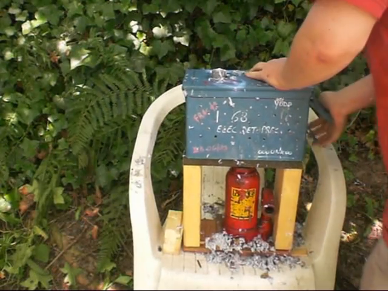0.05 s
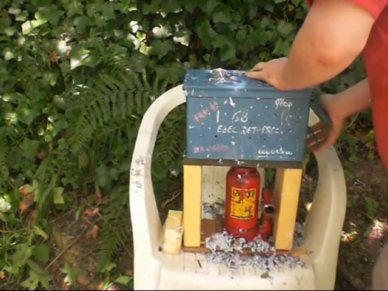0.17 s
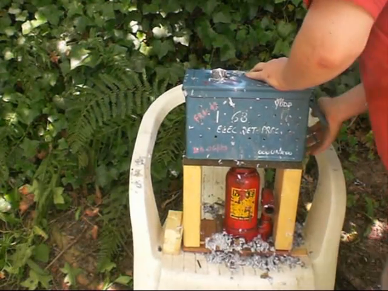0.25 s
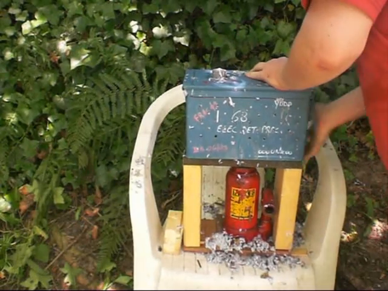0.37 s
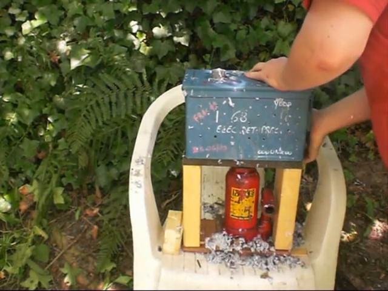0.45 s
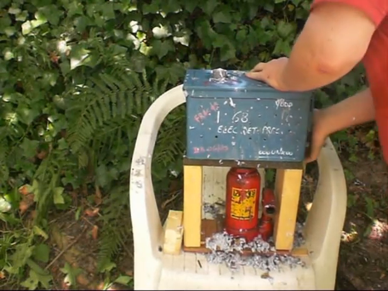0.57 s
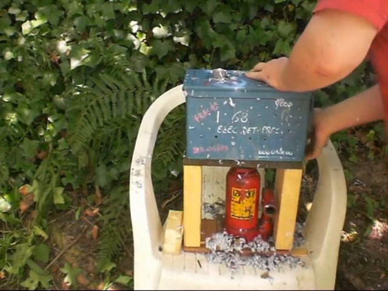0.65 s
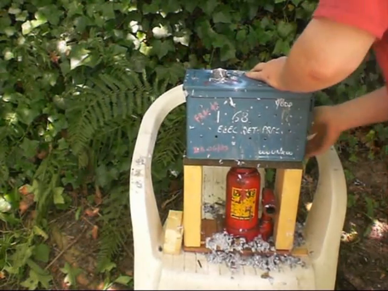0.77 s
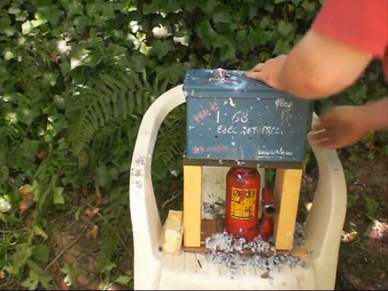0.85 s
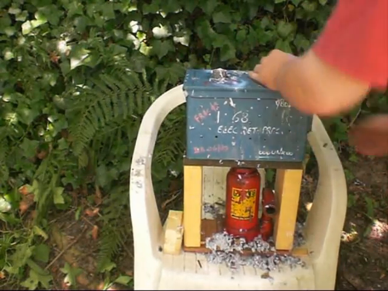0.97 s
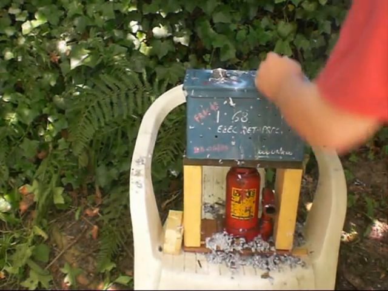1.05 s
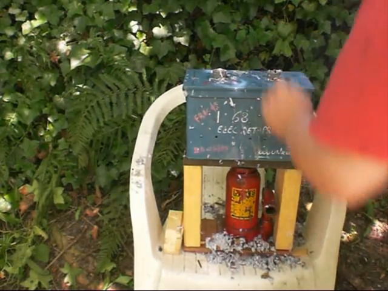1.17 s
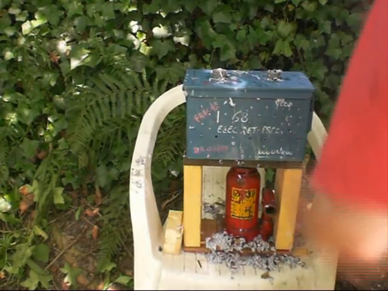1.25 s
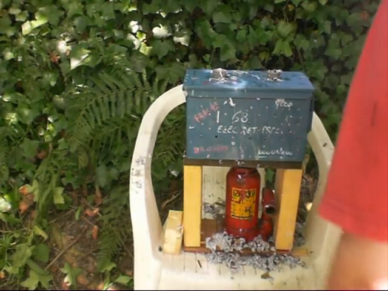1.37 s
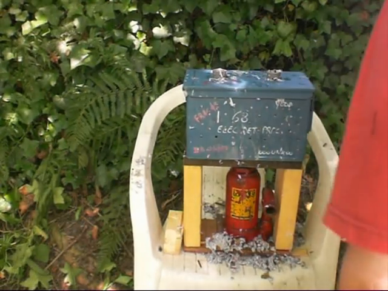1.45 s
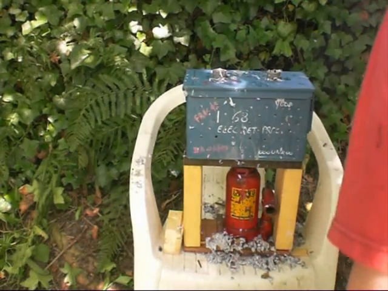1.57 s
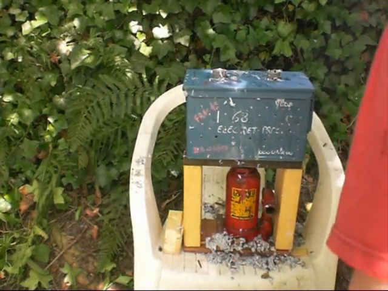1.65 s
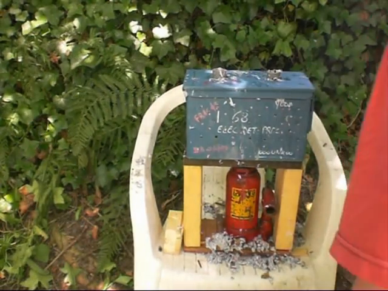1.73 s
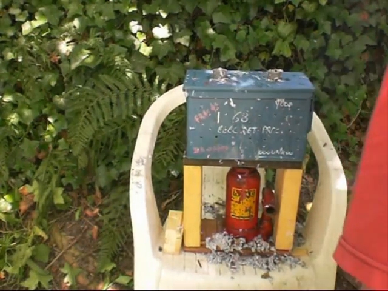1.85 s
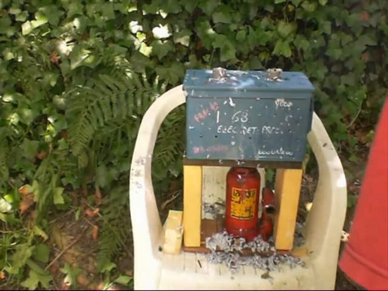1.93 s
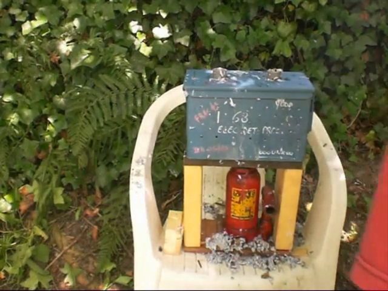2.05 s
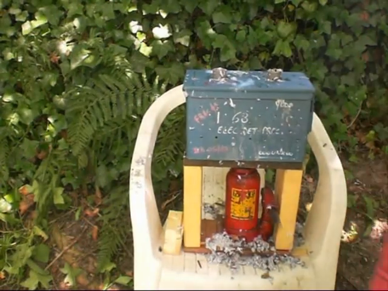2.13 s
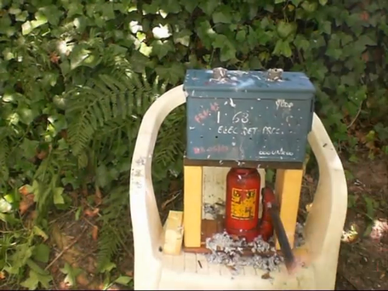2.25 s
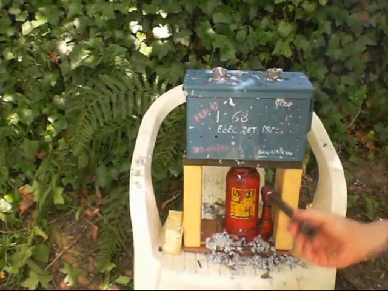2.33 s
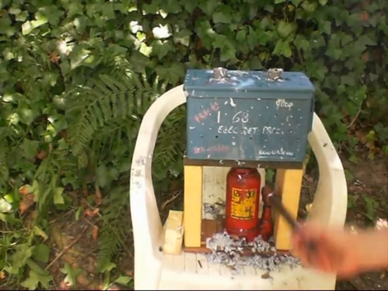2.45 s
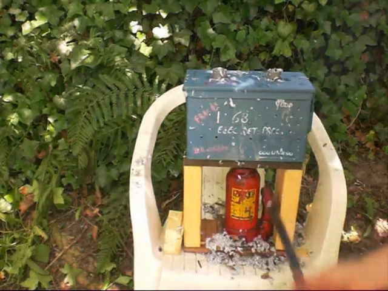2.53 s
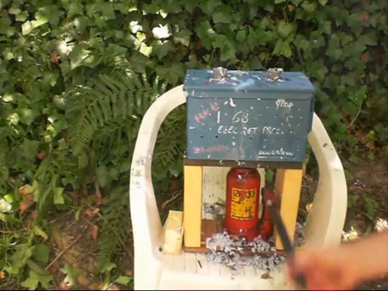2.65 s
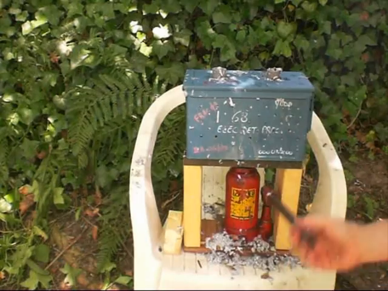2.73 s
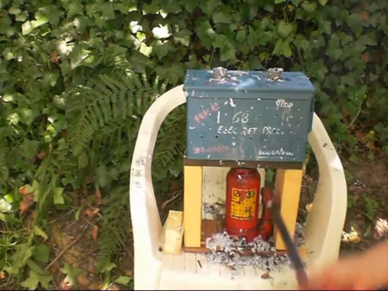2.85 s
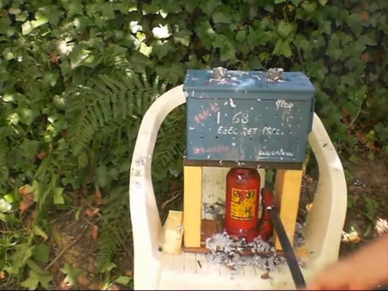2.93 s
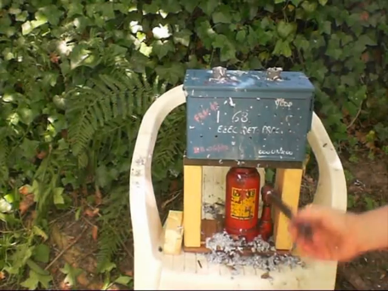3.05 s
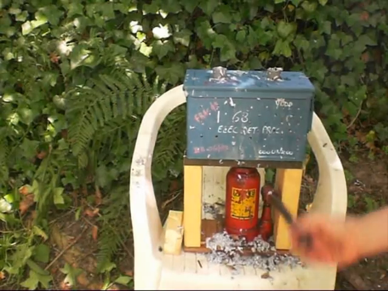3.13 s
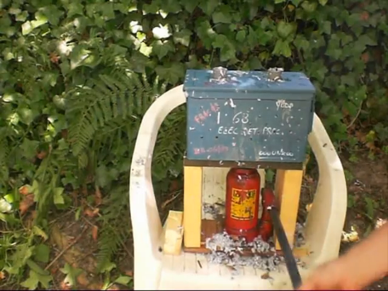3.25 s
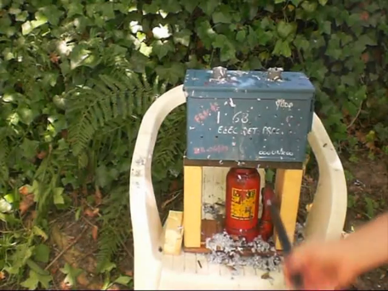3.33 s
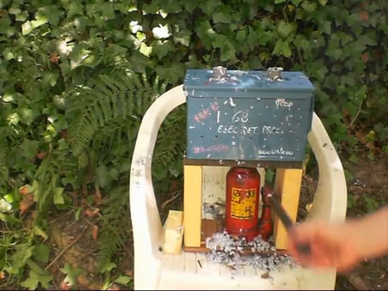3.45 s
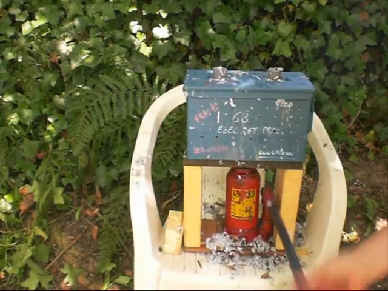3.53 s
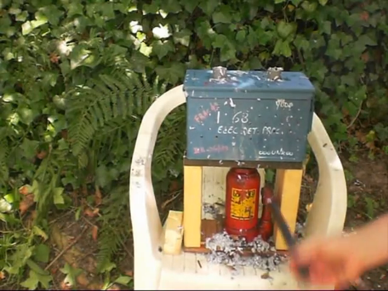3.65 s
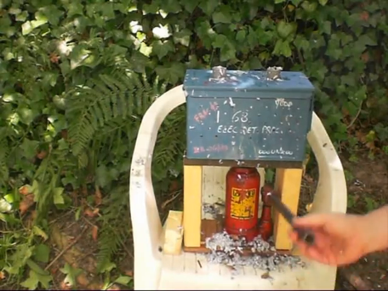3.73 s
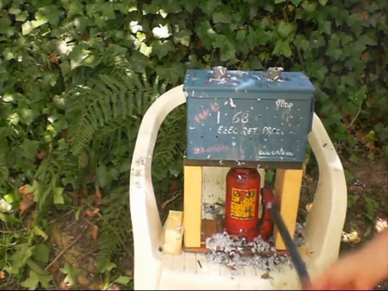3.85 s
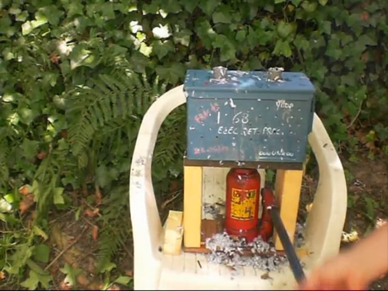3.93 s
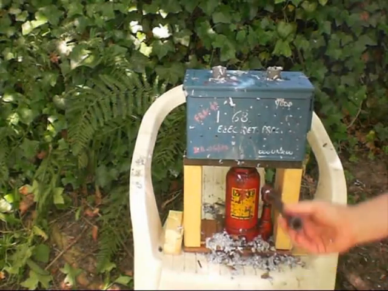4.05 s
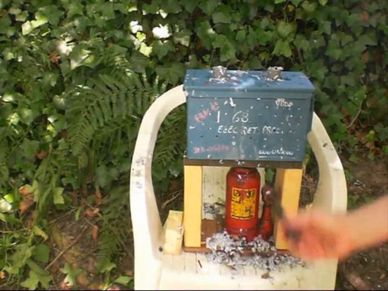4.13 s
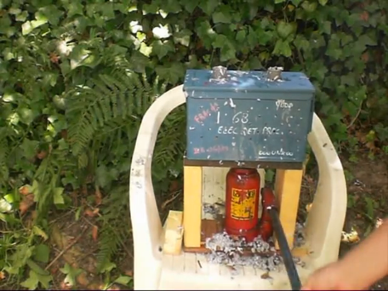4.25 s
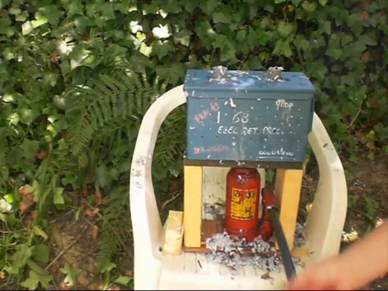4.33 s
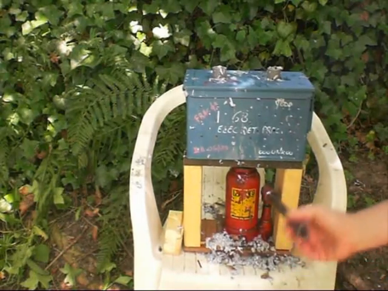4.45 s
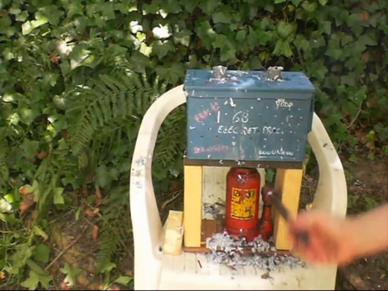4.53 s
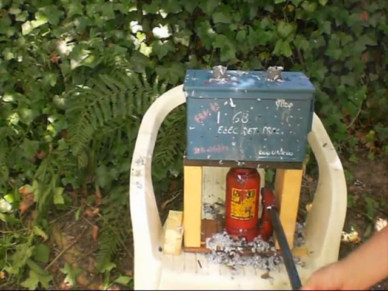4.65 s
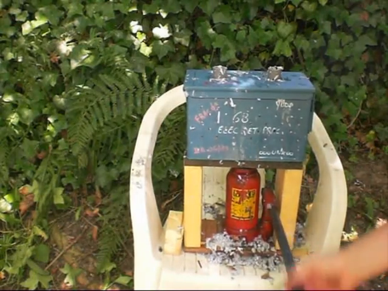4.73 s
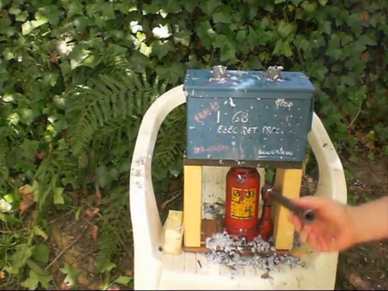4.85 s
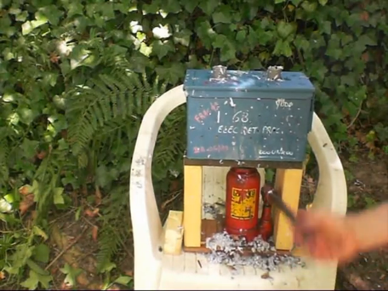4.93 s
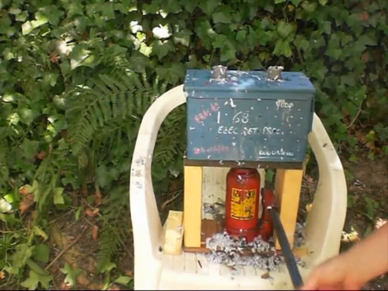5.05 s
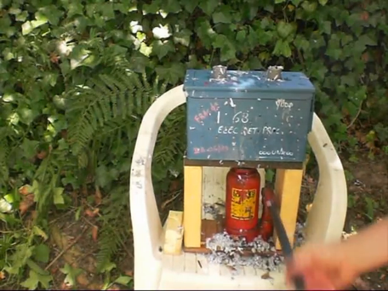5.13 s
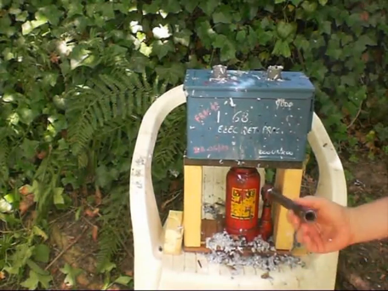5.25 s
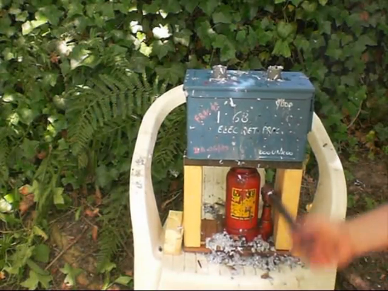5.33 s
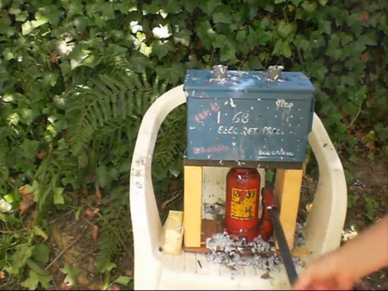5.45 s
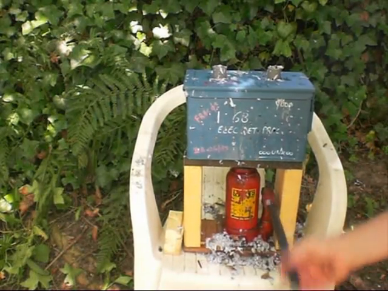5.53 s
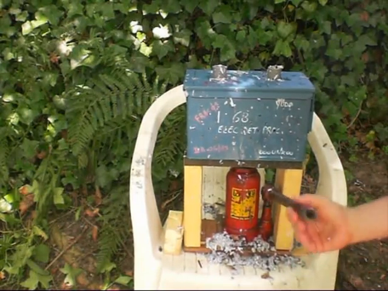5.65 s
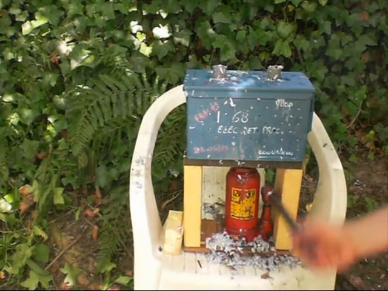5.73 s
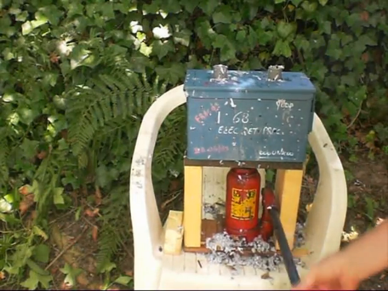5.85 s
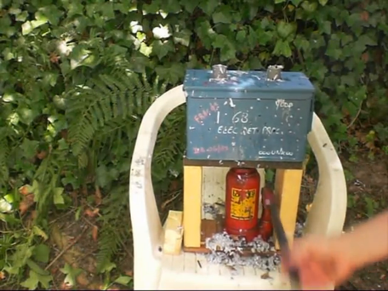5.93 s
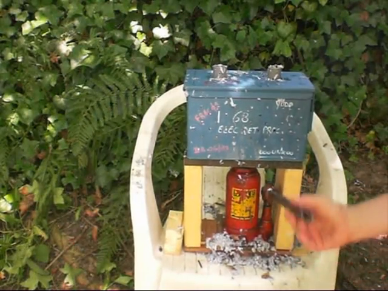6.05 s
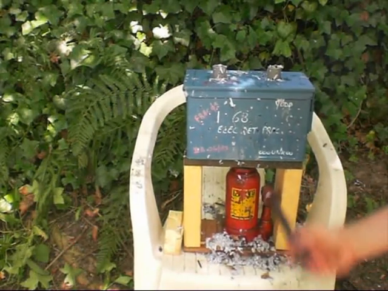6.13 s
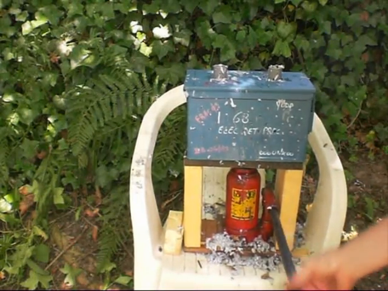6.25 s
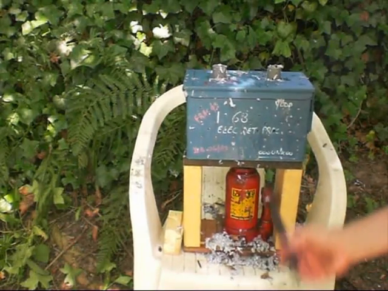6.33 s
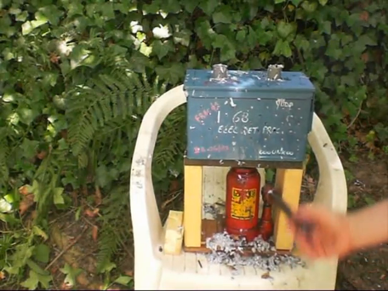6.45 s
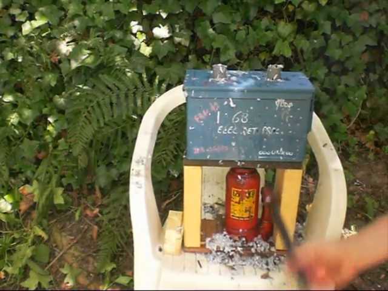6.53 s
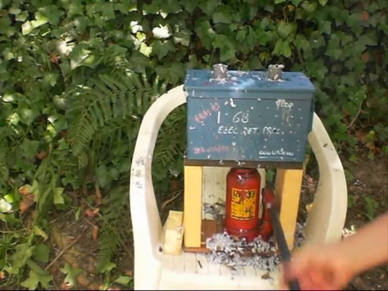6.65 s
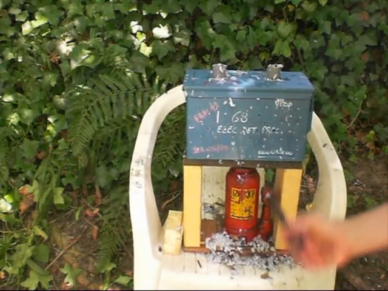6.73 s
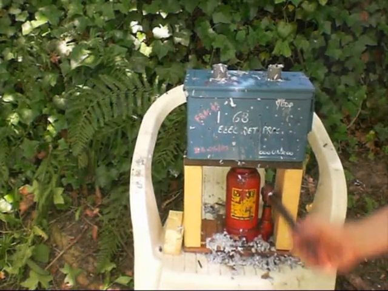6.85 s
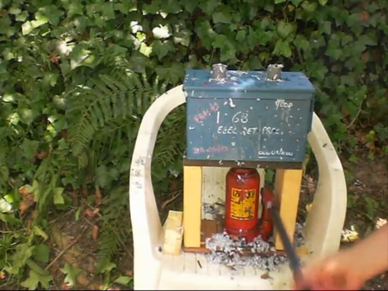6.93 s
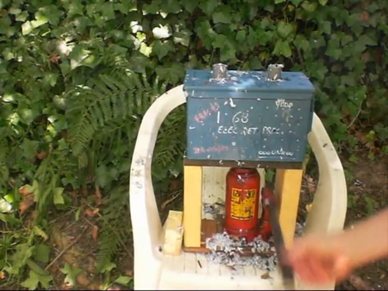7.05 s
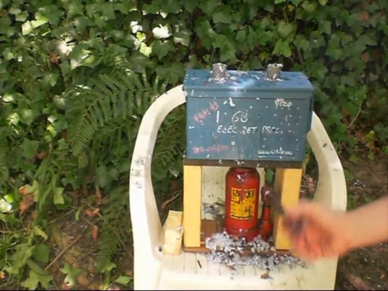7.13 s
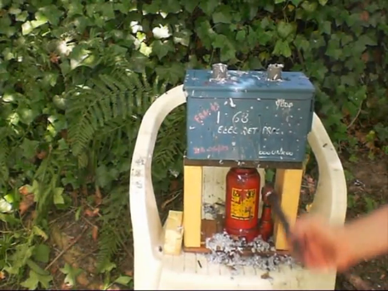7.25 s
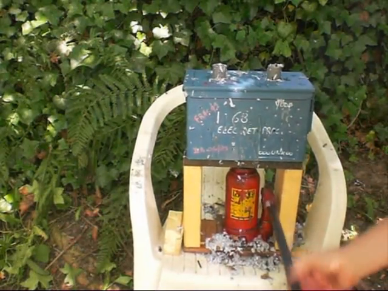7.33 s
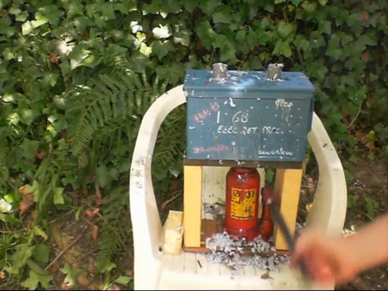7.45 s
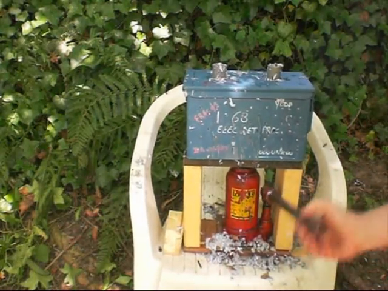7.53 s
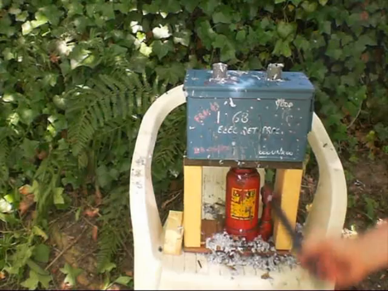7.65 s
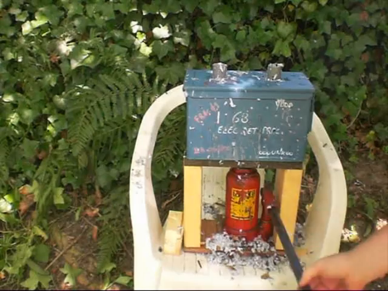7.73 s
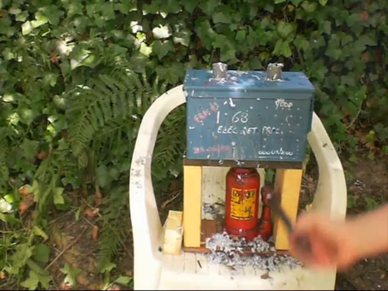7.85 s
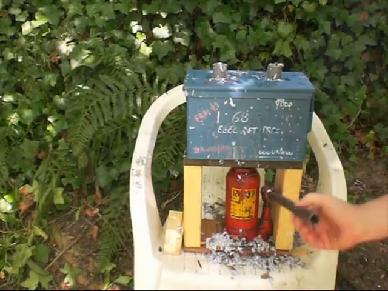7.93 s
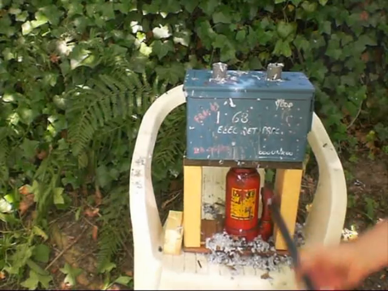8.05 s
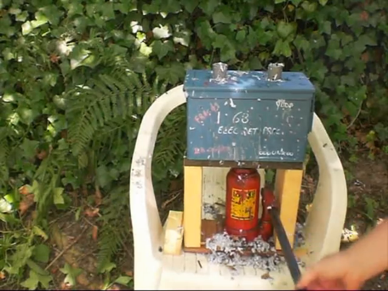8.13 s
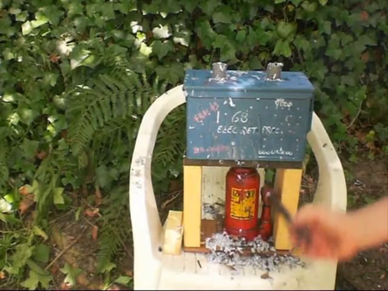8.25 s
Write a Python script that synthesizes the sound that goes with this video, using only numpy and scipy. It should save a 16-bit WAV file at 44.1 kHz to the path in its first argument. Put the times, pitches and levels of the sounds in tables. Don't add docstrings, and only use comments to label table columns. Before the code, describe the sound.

Close outdoors in a garden, a steel box lid gives a faint low groan and its sprung catch snaps shut. Clothes brush softly while small birds chatter far off. After a second and a half the jack handle is fitted and pumped quickly: bright ringing rattles, hard link-plate clacks and dull wooden knocks at both ends of every stroke, with short echoes from hedge and walls.

```python
import sys
import numpy as np
from scipy import signal
from scipy.fft import rfft, irfft, next_fast_len
from scipy.io import wavfile
from scipy.ndimage import uniform_filter1d

SR = 44100
rng = np.random.default_rng(int(sys.argv[2]) if len(sys.argv) > 2 else 0)


def magnitude_from_level(level_db):
    exponent = np.asarray(level_db, float) / 20
    return 10 ** exponent


def put_to_file(sound):
    columns = np.atleast_2d(sound).T
    safe = np.clip(columns, -1, 1)
    whole_steps = np.round(safe * 32767)
    wavfile.write(sys.argv[1], SR, whole_steps.astype(np.int16))


N = 365148

# pitch_hz, t60_s
HANDLE_MODES = [(1911, .09), (3622, .12), (5760, .17), (8192, .22)]
# start_s, body_db, links_db, handle_db, brightness_db (per mode)
LIFTS = [(1.663, -24.5, -14.5, -43, -1), (2.0738, -18.5, -20, -37, 3.5), (2.503, -11, -38, -30.5, 2.5),
         (2.826, -10.5, -37, -35, 3.5), (3.1378, -13, -10, -35.5, 1.5), (3.4866, -15.5, -19, -34.5, 7),
         (3.8054, -15, -23, -28.5, 1.5), (4.1457, -12, -6, -34.5, 1), (4.5431, -18.5, -8.5, -32.5, 1.5),
         (4.9086, -22.5, -10.5, -39, 1.5), (5.314, -17, -17, -43.5, 2), (5.7065, -17.5, -27, -46.5, 1),
         (6.0934, -14, -31, -35.5, 4), (6.4783, -17.5, -15, -42, 3), (6.8451, -16, -13, -38.5, 1),
         (7.2269, -16, -6.5, -39.5, 0.5), (7.5946, -23.5, -40, -64, -6), (7.991, -15, -10.5, -37.5, 2)]
# start_s, body_db, links_db, handle_db, brightness_db (per mode)
STOPS = [(1.907, -39, -9.5, -32.5, 0), (2.2782, -31, -7.5, -33, 2), (2.678, -17, -6.5, -34, -2.5),
         (2.996, -22, -20, -32.5, -3), (3.3311, -16.5, -17, -26, -1.5), (3.661, -22, -14.5, -46, -2.5),
         (3.981, -16, -1.5, -35, 6), (4.376, -25, -3, -31, 0), (4.7622, -26, -10, -24.5, 2),
         (5.1422, -30, -0.5, -26.5, 1.5), (5.5354, -17.5, 2, -30.5, 1), (5.938, -17, -1, -26.5, 1),
         (6.3154, -20, -5.5, -27, 2), (6.6869, -27, -5.5, -31.5, 0.5), (7.0802, -16.5, -9, -53, 6),
         (7.4643, -17, -6, -25.5, -1), (7.8283, -16, -4.5, -31, -3), (8.2167, -21.5, -7.5, -33.5, -2)]
# start_s, body_db, links_db, handle_db, brightness_db (per mode)
SKIPS = [(2.486, -55, -43, -64.5, 0), (2.516, -31, -37, -30, 6), (2.668, -42, -7, -37.5, 3.5),
         (2.853, -22, -34, -33.5, 9), (3.848, -25, -21, -37, 7), (4.7435, -41, -10, -53, -5.5),
         (5.7741, -20, -3, -35.5, 5.5), (6.264, -47, -45, -44, 4.5), (6.295, -28, -27, -38, 7),
         (6.641, -39, -45, -43, 3), (6.67, -25, -27, -40, 4), (6.8999, -24, -26, -36.5, 5.5),
         (6.914, -25.5, 2, -39.5, 6), (7.0686, -29, -10, -35, 3), (7.446, -23, -16, -36, 4.5),
         (7.6735, -19, -29, -32.5, 7), (7.683, -12.5, -4, -40.5, 3), (8.0511, -28, -27, -32.5, 6.5),
         (8.209, -27, -13, -41.5, -2)]
# start_s, body_db, links_db
CLACKS = [(1.496, -50, -15.5), (1.543, -21.5, -8), (1.7084, -32, -16), (1.725, -43, -9), (2.528, -33, 2.5),
          (2.5396, -30, -11), (2.577, -60, -34), (2.866, -19.5, 2), (3.5332, -20, -3), (3.8595, -16, 0.5),
          (3.898, -42, -36), (4.2042, -24.5, 0.5), (4.607, -21, -3), (4.77, -46, -4), (4.988, -21, -0.5),
          (5.382, -21, -3), (5.7904, -16.5, -2.5), (6.159, -19, -4.5), (6.5424, -22, -3.5),
          (6.9325, -25, -13.5), (7.306, -16.5, -0.5), (7.474, -46, 0), (8.0609, -40, -2.5)]
# start_s, body_db, links_db, lean_to_frame_db
KNOCKS = [(1.8116, -13.5, -10.5, 0), (2.1082, -19.5, -21, 4), (2.1247, -16, -10.5, 2.5),
          (2.196, -7, -2, 2.5), (2.5901, -7.5, -7, -1), (2.923, -8.5, -11, -4.5), (3.2677, 0, -8, 0),
          (3.5941, -3.5, -3, -0.5), (3.9207, -14.5, -18, 1), (4.1909, -14.5, -13, 5), (4.2914, -13, -54, 5),
          (4.6896, -11.5, -17, 6), (5.08, -11, -17, 1.5), (5.4728, -11, -18, 5), (5.858, -4, -2, 0.5),
          (6.2457, -4.5, -1, 2), (6.6239, -5.5, -4.5, 0), (6.99, -4, -5, 2), (8.1468, -16, -20, -0.5)]


def pump():
    # pitch_hz, level_db
    crack_colour = [(100, 4.5), (600, -3.5), (3000, 7), (6300, 13), (7200, -21.5), (9000, 7), (14000, -2),
                    (17000, 1.5)]
    # pitch_hz, level_db
    frame_modes = [(330, -9), (420, 2.5), (600, -2.5), (800, -2), (985, 7)]
    # pitch_hz, level_db
    jack_modes = [(1620, 3), (2300, 15), (2805, 10), (3150, -3), (4150, 10.5)]
    # pitch_hz, level_db
    link_modes = [(5150, -1.5), (5550, 14.5)]
    s, crack_db, frame_db, jack_db, links_db = blows()
    shut = np.isin(s, np.transpose(CLACKS)[0])[:, None]
    brief = shut | np.isin(s, np.transpose(KNOCKS)[0])[:, None]
    snaps = chatter(s, crack_db, 0.001, np.where(brief, 0.0018, 0.0055), 3.0)
    crack = magnitude_from_level(21.0) * coloured(placed(s, snaps), crack_colour)

    frame_force = chatter(s, frame_db, 0.0012, 0.0081, 1.4)
    frame = struck(frame_force, crowded(frame_modes, 0.03), 0.09, 3.5)
    jack_force = chatter(s, jack_db, 0.001, 0.003, 3.0)
    jack = struck(jack_force, crowded(jack_modes, 0.013), 0.07, 1.5)
    seat = np.where(shut, 1, 1.02)[:, :, None]
    links_force = chatter(s, links_db, 0.0008, np.where(shut, 0.0011, 0.0025), 3.0)
    links = struck(links_force, crowded(link_modes, 0.02), 0.04, 2.0, pitch=seat)
    return crack + placed(s, magnitude_from_level(-6.0) * frame + magnitude_from_level(-2.5) * jack + magnitude_from_level(-8.5) * links)


def blows():
    # start_s, body_db, links_db
    bounces = [(1.3808, -28, -28), (1.4848, -29, -20), (1.5049, -24.5, -31), (1.7344, -31, -12),
               (1.918, -33, -9.5), (2.2975, -23, -22), (3.013, -18.5, -11), (3.2, -29, -11),
               (3.3472, -15, -19), (3.974, -22, -22), (3.9965, -24, -10), (4.2143, -38, -32),
               (4.3572, -27, -41), (5.517, -19, -27), (6.3313, -20.5, -26), (6.694, -14, -0.5),
               (7.0555, -20, -14), (7.8183, -26, -26), (7.842, -23.5, -10)]
    # start_s, body_db, links_db
    nudges = [(2.191, -33, -46), (3.186, -20.5, -45), (3.1914, -26, -42), (3.25, -25, -26),
              (3.314, -22, -32), (3.516, -28, -26), (3.5246, -27, -25), (3.5783, -24.5, -44),
              (3.6455, -25, -46), (4.5868, -24, -21), (4.68, -34, -50), (5.05, -31.5, -50),
              (5.3665, -26, -30), (5.3717, -26, -21), (5.464, -31, -50), (5.751, -26, -24),
              (5.7614, -22, -17), (5.8277, -29, -43), (6.142, -22, -36), (6.2216, -31, -33),
              (6.5226, -26, -25), (6.5312, -20.5, -14), (6.6115, -31, -34), (7.14, -37, -25),
              (7.28, -24, -40), (7.4086, -23.5, -40), (7.661, -23, -40), (7.7803, -25, -42),
              (8.0412, -26, -38)]
    # start_s, level_db
    touches = [
        (1.271, -38),
        (4.87, -30.5),
        (4.974, -27),
        (5.123, -20),
        (5.9235, -18.5),
    ]
    ticks = [(s, db - 7.5, db) for s, db in touches]
    # frame dB, jack dB, crack dB
    kinds = [(LIFTS, (1.5, 1.5, -0.5)), (STOPS, (0, 5.5, 3)), (SKIPS, (3, -1, -0.5)),
             (CLACKS, (2.5, -27, 1)), (KNOCKS, (-8, 0, -3.5)), (bounces, (-3, 5, 1)),
             (nudges, (3.5, -3.5, -3)), (ticks, (-3, 5, 1))]
    rows = []
    for table, (frame_db, jack_db, crack_db) in kinds:
        for s, body_db, links_db, *more in table:
            lean_db = more[0] if len(more) == 1 else 0
            handle_db = more[0] if len(more) == 2 else -90
            parts = magnitude_from_level([body_db - 11, links_db - 13.5, handle_db + 10.5])
            crack = crack_db + 20 * np.log10(np.linalg.norm(parts))
            rows.append((s, crack, body_db + frame_db + lean_db, body_db + jack_db - lean_db, links_db))
    return np.transpose(rows)


def handle():
    # pitch_hz, level_db, t60_s
    top_modes = [(9690, -4, 0.11), (11070, -1, 0.12), (12700, -6, 0.6), (13880, -5, 0.15)]
    s, *levels_db = rings_of_bar()
    forces = [chatter(s, db, 0.001, 0.003, 3.0) for db in levels_db]
    low = 0
    for force, (hz, t60) in zip(forces, HANDLE_MODES):
        low = low + struck(force, [(hz, 0, t60)], 0.003, 0, size=5600)
    rings = magnitude_from_level(8) * low + magnitude_from_level(2.5) * struck(forces[-1], top_modes, 0.005, 4.0, size=5600)

    contacts = np.append(np.sort(blows()[0]), N / SR)
    free = contacts[np.searchsorted(contacts, s + 0.006)] - s
    lifted = np.isin(s, np.transpose(LIFTS)[0] - 0.001)
    free = np.minimum(free, np.where(lifted, 0.04, 0.017))
    t = np.arange(rings.shape[1]) / SR
    held = np.maximum(t - free[:, None], 0)
    flutter = evened(uniform_filter1d(rng.standard_normal(rings.shape), size=160, axis=1))
    rings = rings * magnitude_from_level(2.2 * flutter)
    settled_db = 3 - 9 * (1 - np.exp(-t / 0.015))
    choked_db = -14.6 * (1 - np.exp(-held / 0.0017))
    return placed(s, rings * magnitude_from_level(settled_db + choked_db))


def rings_of_bar():
    kinds = [(LIFTS, (7, 6.5, 3.5, -3)), (STOPS, (1, -0.049, 1, -0.027)), (SKIPS, (9.5, 10, 4.5, -8))]
    steps = np.arange(len(HANDLE_MODES)) - (len(HANDLE_MODES) - 1) / 2
    rows = []
    for table, place_db in kinds:
        for s, _, _, db, slope in table:
            rows.append((s - 0.001, *(db + np.array(place_db) + slope * steps)))
    return np.transpose(rows)


def loaded_parts():
    # start_s, peak_db, pitch_hz
    boards = [(1.665, -23, 900), (1.813, -24, 624), (2.197, -21, 914), (2.506, -8, 618), (2.59, -16, 870),
              (2.829, -17.5, 563), (2.927, -5, 934), (3.141, -21, 830), (3.251, -19, 666), (3.27, -7, 1050),
              (3.333, -17, 1060), (3.488, -16, 955), (3.579, -17, 684), (3.595, -15.5, 507),
              (3.807, -19, 940), (3.859, -17, 1160), (3.924, -8.5, 973), (4.147, -20, 840),
              (4.291, -26, 880), (4.544, -14.5, 896), (4.691, -13.5, 674), (5.082, -14, 1013),
              (5.475, -9, 954), (5.707, -22, 1190), (5.859, -8, 850), (5.939, -16, 870), (6.093, -14, 900),
              (6.223, -22, 694), (6.25, -10, 990), (6.533, -19, 975), (6.609, -24, 660), (6.626, -11, 936),
              (6.848, -25, 860), (6.992, -10, 925), (7.082, -21, 935), (7.229, -21, 940), (7.312, -20, 870),
              (7.662, -20.5, 650), (7.783, -25, 925), (7.83, -27, 930), (7.994, -17.5, 896),
              (8.04, -25, 960), (8.153, -19.5, 970)]
    # start_s, peak_db, pitch_hz
    castings = [(1.8117, -11.5, 2820), (1.9065, -9, 2460), (2.0754, -11, 3200), (2.281, -7.5, 2510),
                (2.5016, -23, 3360), (2.5905, -25, 2620), (2.6698, -11, 2320), (2.8273, -5.5, 2920),
                (2.9234, -11, 2360), (2.998, -22, 2620), (3.1358, -1, 3300), (3.2664, -11, 2780),
                (3.3287, -13, 2680), (3.347, 1, 2540), (3.4894, -8.5, 2770), (3.5953, -28, 2500),
                (3.8048, -3, 3060), (3.9209, -16, 2190), (4.1474, -23, 2560), (4.2905, -8.5, 2850),
                (4.3569, -14, 2400), (4.3767, -8, 2610), (4.5422, -10.5, 2900), (4.689, -7.5, 2480),
                (4.742, -9, 2470), (4.9084, -12.5, 3200), (5.3148, -14, 2920), (5.3671, -19, 3150),
                (5.4736, -8, 2500), (5.858, -3, 2170), (5.9403, -6, 2830), (6.094, -2.5, 3060),
                (6.236, -25, 2470), (6.2471, -6.5, 2420), (6.295, -9.5, 2480), (6.4776, -8, 3160),
                (6.6242, -23, 2700), (6.672, -28, 2550), (6.8428, -11.5, 2650), (6.9, -30, 2980),
                (6.9925, -4.5, 2780), (7.0517, -12, 2500), (7.08, 0.5, 2600), (7.2282, -11, 2680),
                (7.4455, -7, 2640), (7.671, -8, 3200), (7.9917, -19, 2970), (8.049, -25, 3000),
                (8.1486, -14, 2650)]
    # start_s, peak_db, pitch_hz
    plates = [(1.5439, -24, 5800), (1.9092, -6, 5850), (2.197, -5, 5380), (2.2802, -8, 6100),
              (2.5287, 4, 5500), (2.6777, -6.5, 5870), (2.8674, 2, 5670), (2.9966, -7, 5780),
              (3.3284, -1.5, 5660), (3.5334, -4, 5080), (3.5952, -16, 5200), (3.664, -20, 6100),
              (3.8591, 4, 5180), (3.9804, -15, 4870), (4.2052, -2, 5550), (4.3766, -14, 5760),
              (4.6079, -1, 5150), (4.7626, 3, 6000), (4.9906, 0.5, 5500), (5.1426, -7, 5900),
              (5.3822, -2.5, 5400), (5.5364, -15, 5500), (5.7744, 2, 5480), (5.9388, -5, 4730),
              (6.1598, 2, 5260), (6.2449, -10, 5700), (6.3173, -2.5, 5950), (6.5412, 1.5, 5450),
              (6.6916, -1.5, 5800), (6.9148, 1, 5500), (7.3058, -0.5, 5200), (7.4638, -3.5, 4430),
              (7.6725, 0, 5500), (7.8311, 1, 4720), (8.0626, 2, 5650), (8.2162, -8, 4800)]
    # start_s, peak_db
    rebounds = [(1.915, -6), (2.875, -12), (3.869, -11), (3.9895, -14), (4.2138, -10), (4.7492, -13),
                (4.7689, -4), (4.7792, -16), (4.996, -7.5), (5.1494, -6.5), (5.543, -4.5), (5.5513, -10),
                (5.7845, -5), (5.7955, -15), (5.9449, -2), (6.1651, -5), (6.699, -16), (6.9265, -13),
                (7.0767, -13), (7.3103, -5), (7.4702, -5), (7.482, -19), (8.0555, -12), (8.2235, -10)]
    # start_s, peak_db
    singing = [(1.9056, -34), (2.0727, -16), (2.2797, -19), (2.5164, -23), (2.8275, -12), (3.3308, -13),
               (3.488, -3.5), (5.1414, -18), (5.5353, -9.5), (5.7069, -12.5), (5.9379, -21), (6.0945, -7),
               (6.2971, -9.5), (6.318, -11), (6.6727, -6.5), (6.6912, -4.5), (7.2285, -12), (7.4634, -14),
               (7.6725, -8.5), (7.9937, -5.5)]

    def nearest_hz(s):
        return min(plates, key=lambda row: abs(row[0] - s))[2]

    sings = [(s, db, HANDLE_MODES[1][0]) for s, db in singing]
    again = [(s, db, nearest_hz(s)) for s, db in rebounds]
    return (leading(boards, 0.051, 0.0027, 0.021, db=-9.0)
            + leading(castings, 0.014, 0.0029, 0.038, db=-7)
            + leading(plates, 0.025, 0.00094, 0.018, db=-9)
            + leading(again, 0.014, 0.00098, 0.024, db=-3)
            + leading(sings, 0.062, 0.0026, 0.0042, db=-5.5))


def leading(table, t60, force_s, scatter, db):
    s, peak_db, hz = np.transpose(table)
    hz = hz[:, None, None]
    forces = chatter(s, peak_db + db, 0.001, force_s, 2.0)
    modes = [(1, 0, t60)] * 4
    return placed(s, struck(forces, modes, scatter * hz, 2.0, size=2200, pitch=hz))


def scrapes():
    # start_s, peak_db
    pin_scrapes = [
        (1.5446, -10.5),
        (1.7544, -36),
        (5.372, -23),
        (5.3862, -3),
        (8.0612, -0.5),
    ]
    s, db = np.transpose(pin_scrapes)
    grit = placed(s, chatter(s, db + 13, 0.00087, 0.0036, 2.0))
    return signal.sosfilt(signal.butter(2, 8500, "high", fs=SR, output="sos"), grit)


def latch():
    # start_s, level_db
    catch_blows = [
        (0.4117, -35),
        (0.417, -6),
        (0.4326, -21),
        (0.51, -37.5),
    ]
    # pitch_hz, level_db, t60_s
    box_modes = [(383, -20, 0.04), (457, 4.5, 0.055), (820, 9, .022), (1190, 5, 0.048), (2010, 5, 0.035),
                 (2220, 14.5, 0.046), (3150, 7, 0.027), (3580, 11.5, .035)]
    # pitch_hz, level_db
    snap_colour = [(18, -48), (30, -47), (1450, -7.5), (2220, -8.5), (14800, -16), (16500, -15)]
    # middle_s, level_db, pitch_hz
    lid_rub = (0.26, -44.5, 400)
    s, db = np.transpose(catch_blows)
    snap = magnitude_from_level(22.5) * coloured(placed(s, chatter(s, db, 0.00072, 0.0028, 1.0)), snap_colour)
    slap = abs(chatter(s + 0.001, db, 0.00005, 0.00006, 1.0))
    box = magnitude_from_level(-4.5) * placed(s, struck(slap, box_modes * 3, 0.029, 1.3, size=3600))

    at, rub_db, hz = lid_rub
    band = signal.butter(2, [hz * 0.61, hz * 1.13], "band", fs=SR, output="sos")
    rub = evened(signal.sosfilt(band, rng.standard_normal(N)))
    bell = np.exp(-((np.arange(N) / SR - at) / 0.025) ** 2)
    return snap + box + magnitude_from_level(rub_db) * rub * bell


def chatter(times, levels_db, rise, seconds, grit):
    t = np.arange(1200) / SR
    noise, lumps = rng.standard_normal((len(times), 2, len(t))).transpose(1, 0, 2)
    lumps = uniform_filter1d(lumps, size=40, axis=1) * np.sqrt(40)
    envelope = (1 - np.exp(-(t / rise) ** 2)) * np.exp(-t / seconds)
    bursts = noise * magnitude_from_level(grit * lumps) * envelope
    return magnitude_from_level(levels_db)[:, None] * bursts / np.linalg.norm(bursts, axis=1, keepdims=True)


def struck(forces, modes, scatter, uneven_db, size=1500, pitch=1):
    hz, db, t60 = np.transpose(modes)[:, :, None]
    t = np.arange(size) / SR
    shift, weight = rng.standard_normal((len(forces), 2, len(modes), 1)).transpose(1, 0, 2, 3)
    gain = magnitude_from_level(db + uneven_db * weight)
    waves = np.sin(2 * np.pi * hz * (pitch + scatter * shift) * t)
    rings = (gain * magnitude_from_level(-60 * t / t60) * waves).sum(1)
    rings = signal.fftconvolve(forces, rings, axes=1)
    full = np.sqrt(np.mean(t60) * SR / np.log(10 ** 6))
    return rings * (full * np.linalg.norm(forces, axis=1) / np.linalg.norm(rings, axis=1))[:, None]


def crowded(modes, t60):
    return [(hz, db, t60) for hz, db in modes for _ in range(5)]


def placed(times, sounds):
    out = np.zeros(N)
    for s, sound in zip(times, sounds):
        part = out[round(s * SR):][:len(sound)]
        part += sound[:len(part)]
    return out


def evened(x):
    return x / np.sqrt(np.mean(x ** 2) + 1e-20)


def read(points, hz):
    f, value = np.transpose(points)
    return np.interp(np.log(hz + 1), np.log(f + 1), value)


def coloured(x, points):
    size = next_fast_len(len(x))
    gain = magnitude_from_level(read(points, np.fft.rfftfreq(size, 1 / SR)))
    return irfft(rfft(x, size) * evened(gain), size)[:len(x)]


def birds():
    # start_s, length_s, level_db, first_hz, last_hz
    bursts = [(0, 0.076, -48, 4960, 4860), (0.056, 0.09, -50.5, 3600, 3300), (0.181, 0.28, -43, 4960, 4780),
              (0.234, 0.11, -40, 4140, 3950), (0.257, 0.13, -46.5, 3250, 3150),
              (0.541, 0.061, -52, 3330, 3030), (0.781, 0.054, -53, 4560, 4310),
              (0.852, 0.077, -52, 3420, 3990), (0.999, 0.3, -58, 4940, 4260),
              (1.325, 0.12, -45.5, 4540, 5040), (1.344, 0.2, -40, 3320, 3890),
              (2.58, 0.44, -48, 5150, 4500), (2.586, 0.63, -50, 3930, 3700), (3.288, 0.18, -44, 5040, 4600),
              (5.54, 0.11, -40.5, 3580, 3270), (7.572, 0.071, -38, 5070, 4520),
              (7.68, 0.15, -40.5, 4460, 3480)]
    t, flock = np.arange(3000) / SR, np.zeros(N)
    for s, length, db, first_hz, last_hz in bursts:
        when = rng.random(size=36)
        pitch, size, glide = rng.standard_normal(size=(3, 36, 1))
        spread = 0.0293 + 0.093 * np.tanh(pitch)
        middle_hz = first_hz + (last_hz - first_hz) * when[:, None]
        hz = middle_hz * (1 + spread + (0.627 * glide - 1.2) * t)
        hoarse = evened(uniform_filter1d(rng.standard_normal(hz.shape), size=150, axis=1))
        whistle = np.sin(2 * np.pi * np.cumsum(hz, axis=1) / SR)
        notes = magnitude_from_level(db + 1.6 * size) * hoarse * np.hanning(len(t)) * whistle
        flock += placed(np.maximum(s - 0.02 + length * when, 0), notes * np.sqrt(length))
    return 0.88 * flock + 0.64 * garden(flock)


def garden(x):
    # pitch_hz, t60_s
    echo_decay = [(100, 0.3), (3000, 0.14), (5800, 0.19), (7500, 0.18), (16000, 0.16)]
    taps = np.zeros(SR // 2)
    at = np.arange(200, len(taps) - 20, 20)
    taps[at + rng.integers(0, 20, len(at))] = rng.choice([-1., 1.], len(at))
    hz, t, z = signal.stft(taps, SR, nperseg=256)
    decay = magnitude_from_level(-60 * t / read(echo_decay, hz)[:, None])
    tail = signal.istft(z * decay, SR, nperseg=256)[1]
    return signal.oaconvolve(x, tail / np.linalg.norm(tail))[:N]


def air():
    # pitch_hz, level_db
    air_colour = [(40, -5.5), (170, 3), (800, -1), (2400, -7.5), (4200, 0), (6300, -10), (15500, -15),
                  (16500, -26)]
    # pitch_hz, rms_db
    whine = (14508, -72)
    # middle_s, half_length_s, level_db, top_hz
    wind = (-3, 4, -71.5, 212)
    # middle_s, half_length_s, level_db
    rustles = [
        (.1, 0.42, -55.5),
        (1.04, 0.066, -55),
        (1.2, 0.099, -62),
        (1.457, 0.11, -46),
    ]
    swell = evened(uniform_filter1d(rng.standard_normal(N), size=6000))
    t = np.arange(N) / SR
    whine_hz, whine_db = whine
    tone = magnitude_from_level(whine_db) * np.sqrt(2) * np.sin(2 * np.pi * whine_hz * t)

    at, half, gust_db, top_hz = wind
    low = signal.sosfilt(signal.butter(2, [40, top_hz], "band", fs=SR, output="sos"), rng.standard_normal(N))
    gust = magnitude_from_level(gust_db) * evened(low) * np.exp(-((t - at) / half) ** 2)
    brushing = sum(magnitude_from_level(db) * np.exp(-((t - s) / half) ** 2) for s, half, db in rustles)
    rustle = brushing * evened(np.diff(rng.standard_normal(N + 1)))
    hiss = magnitude_from_level(-51.5 + 0.63 * swell) * coloured(rng.standard_normal(N), air_colour)
    return hiss + tone + gust + rustle


def scene():
    sounds = [pump(), handle(), loaded_parts()]
    no_bass = signal.butter(1, 330, "high", fs=SR, output="sos")
    parts, bar, loaded = signal.sosfilt(no_bass, sounds)
    parts = parts + loaded
    bar_to_echo = magnitude_from_level(-5.5) * bar
    catch = latch()
    stir = evened(uniform_filter1d(rng.standard_normal(N), size=200))
    swing = 2 * np.pi * np.cumsum(130 * stir) / SR
    echo = garden(parts * np.cos(swing) + bar_to_echo) + garden(parts * np.sin(swing))
    catch_echo = garden(catch * np.cos(swing / 2) * np.sqrt(2))
    near = parts + bar + magnitude_from_level(-12.0) * echo + catch + magnitude_from_level(-13.0) * catch_echo
    return (near + birds() + air() + scrapes())[None]


def top_cut(x):
    return signal.sosfilt(signal.butter(12, 16770, fs=SR, output="sos"), x)


def record(dry):
    # start_s, level_db
    pushes = [
        (0.419, -16.5),
        (2.526, -24),
        (3.488, -25),
        (3.985, -26),
        (8.062, -17.5),
    ]
    # start_s, length_samples
    stutter = (2.4428, 1777)
    s, db = np.transpose(pushes)
    pushed = dry + placed(s, magnitude_from_level(db)[:, None] * np.hanning(130))
    start, size = round(stutter[0] * SR), stutter[1]
    x = pushed.copy()
    x[:, start:start + size] = pushed[:, start + size:start + 2 * size]
    treble_edge = signal.firwin(401, 15950, fs=SR)
    x = signal.oaconvolve(x, treble_edge[None], "same")
    return top_cut(np.clip(x, -1, 1))


dry = scene()
out = record(dry)
put_to_file(out)
```